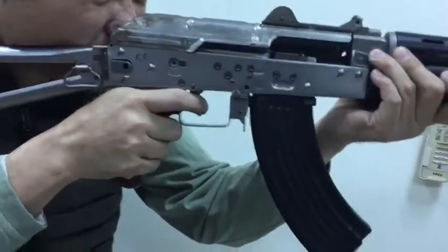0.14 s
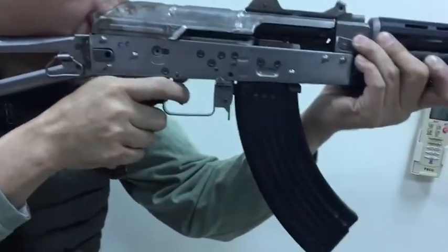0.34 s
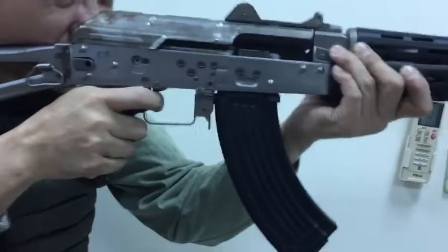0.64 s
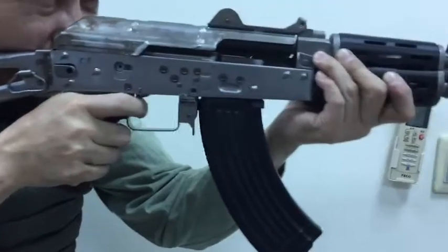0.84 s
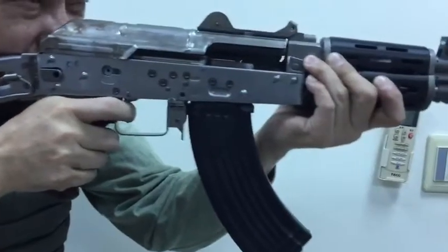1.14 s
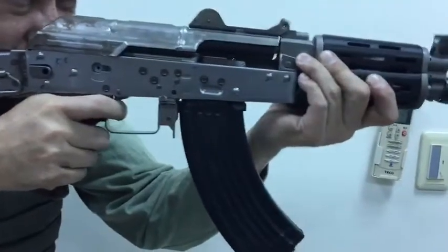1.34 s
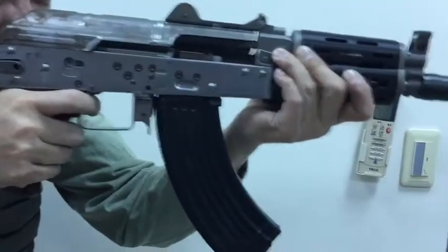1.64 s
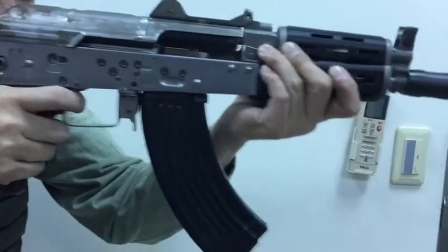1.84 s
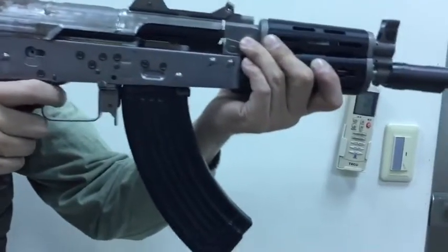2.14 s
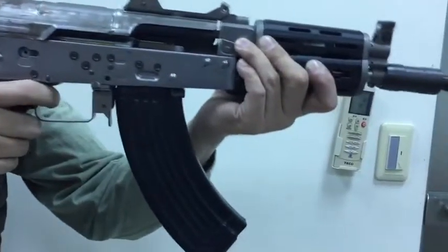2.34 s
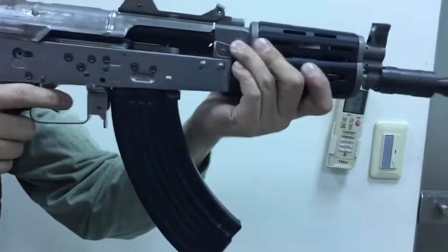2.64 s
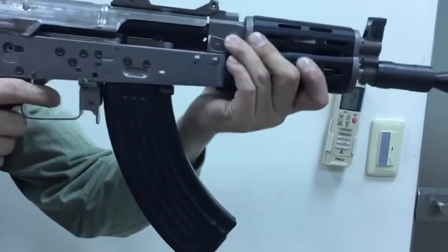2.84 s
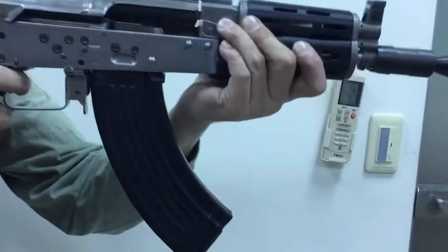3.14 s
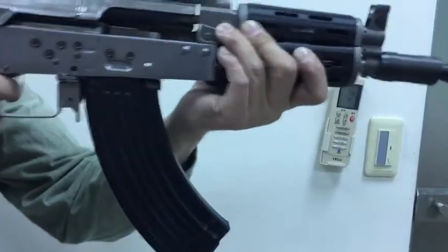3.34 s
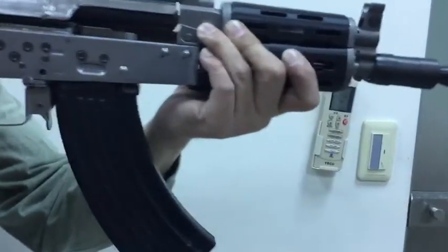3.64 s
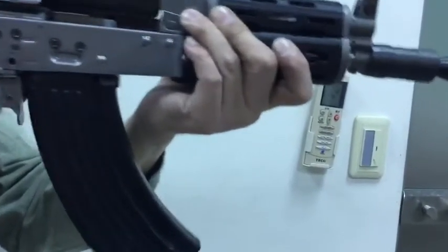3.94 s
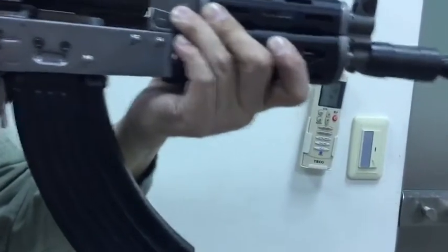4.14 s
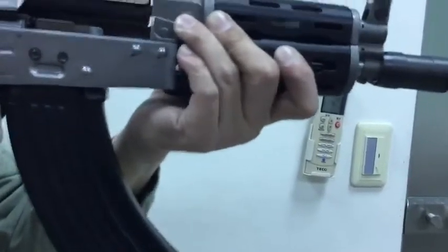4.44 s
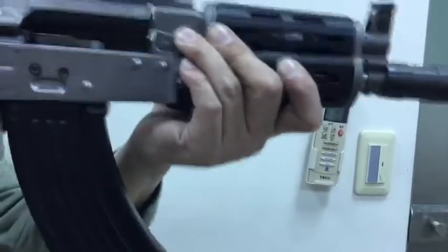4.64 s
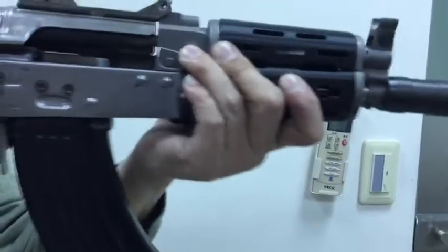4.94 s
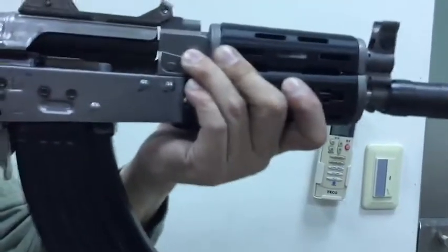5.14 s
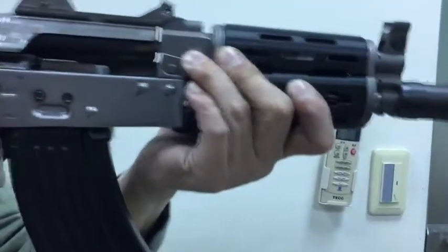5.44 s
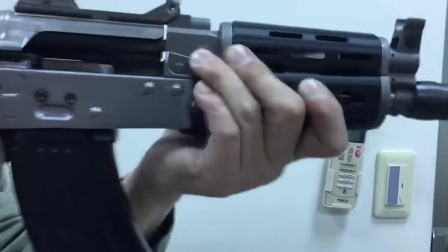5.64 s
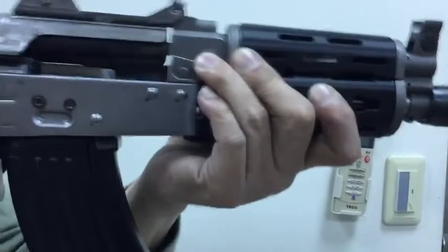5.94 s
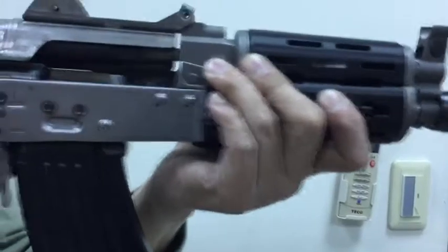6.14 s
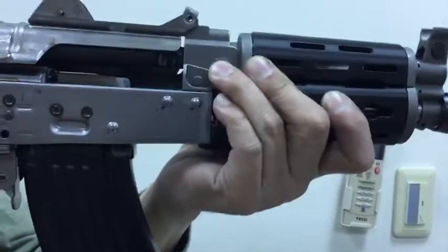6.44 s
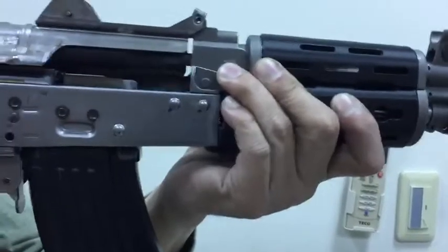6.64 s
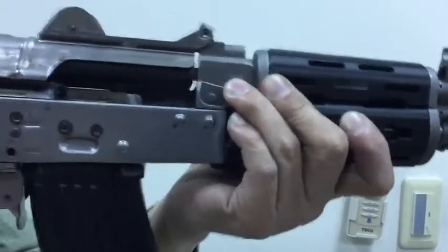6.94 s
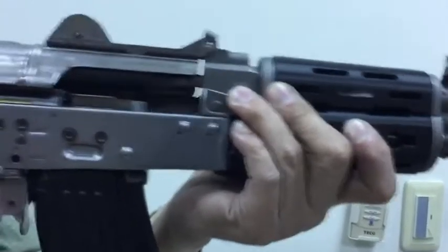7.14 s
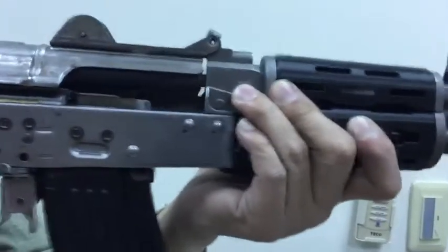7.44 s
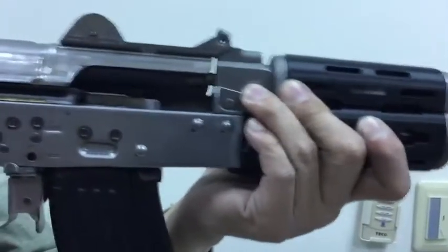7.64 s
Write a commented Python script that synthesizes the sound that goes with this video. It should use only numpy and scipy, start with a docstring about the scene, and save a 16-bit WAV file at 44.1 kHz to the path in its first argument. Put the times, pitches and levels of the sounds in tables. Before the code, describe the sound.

After a faint sleeve rustle, an electric airsoft rifle fires three full-auto bursts with brief pauses between them: a long one, a longer one, then a short one. Each shot is a piston thump followed by a sharp steel clack, repeating fast and evenly over a whining, grinding motor. The microphone is close, and the hard walls of a small room add a short echo.

```python
"""Airsoft rifle in a small room

An electric blowback airsoft rifle fires three full-auto bursts close to the microphone. Its motor
whines up and slows each time it pulls the spring. Fourteen times a second the piston thumps home and
the steel bolt cover clacks shut after it. Hard, near walls echo each blow, and the loudest blows clip."""
import sys
import numpy as np
from scipy import signal
from scipy.fft import rfft, irfft, next_fast_len
from scipy.io import wavfile
from scipy.ndimage import uniform_filter1d, map_coordinates

SR = 44100
rng = np.random.default_rng(int(sys.argv[2]) if len(sys.argv) > 2 else 0)


def output_pcm(signal):
    """Save a mono or channel-first signal as 16-bit PCM at the path in sys.argv[1].

    Samples are clipped to [-1, 1] before scaling.
    """
    pcm = np.clip(np.atleast_2d(signal).T, -1, 1) * 32767
    wavfile.write(sys.argv[1], SR, np.round(pcm).astype(np.int16))


N = 343539
TIME = np.arange(N) / SR
BLOW_TIME = np.arange(SR // 12) / SR  # the seconds within one blow

# Tone of the still air, a rustling sleeve and the room's echo: (frequency [Hz], level [dB])
AIR_TONE = [(25, -16), (60, -10), (130, -11.5), (220, -17.5), (500, -23), (1500, -22), (5000, -30),
            (15000, -47)]
CLOTH_TONE = [(290, -43.5), (500, -9.5), (1680, -2), (2290, 3), (2840, -4.5), (5780, -3.5), (15000, -18.5)]
ECHO_TONE = [(60, -2.5), (200, -13), (500, -9.5), (900, -8.5), (2000, -7.5), (3200, -14.5), (6000, -12),
             (15000, -7.5)]
# How loudly the sleeve rustles: (time [s], level [dB])
SLEEVE_LEVEL = [(0, -63.5), (.17, -61.5), (.23, -73), (.32, -75), (.38, -62), (.44, -76), (.54, -57),
                (.6, -100)]
# How long the echo takes to fade by 60 dB: (frequency [Hz], fade time [s])
ECHO_FADE = [(100, .45), (260, 0.63), (800, 0.43), (2000, 0.43), (5000, 0.62), (13000, 0.33)]
# Standing waves, the notes the room holds: (frequency [Hz], level [dB], fade time [s])
ROOM_NOTES = [(131.7, -60.5, 0.71), (153, -92, .37), (179.3, -67, 0.51), (255.5, -55, 0.38),
              (280, -61, .45), (383.6, -50, 0.1), (506, -82, 0.21), (886, -55, 0.17)]
# First and second bounces off the near walls: (delay [s], treble limit [Hz])
WALL_BOUNCES = [(.0046, 4400), (.0076, 4400), (.011, 900), (.0151, 700)]
# Strength of each of those bounces: (level [dB])
BOUNCE_DB = [-18.5, -13, -30.5, -19]

# Trigger pulls: (motor start [s], first strike [s], second strike [s], starting gap [s], shots [count])
TRIGGER_PULLS = [(.550, .6053, .6583, .06870, 31), (3.183, 3.2487, 3.3240, .06968, 45),
                 (6.708, 6.7647, 6.8434, .07074, 15)]
# The gap between shots grows as the battery sags, one value a pull: (time added per shot [s])
BATTERY_SAG = [.0000292, .0000228, .0000260]
# Each burst opens loud, then settles, one value a pull: (boost at motor start [dB])
OPENING_BOOST = [15, 12, 5]
# Recoil shakes the rifle in the hands: (time [s], level [dB])
RECOIL_BUMPS = [(4.12, -25), (4.25, -27), (4.466, -21), (4.604, -21), (5.095, -23), (5.585, -18),
                (6.15, -24), (6.865, -21), (7.64, -22)]

# Motor speed over one pull of the spring: (place in the cycle [0-1], share of free speed [0-1])
SPEED_UNDER_LOAD = [(0, .9), (.06, .94), (.36, 1), (.57, 1), (.71, .965), (.83, .925), (.94, .89), (1, .9)]
# The whine at even steps from one strike to the next: (level [dB])
WHINE_STRAIN = [-11, -13, -3.5, -1, 1, 5.5, 1.5, -4]
# Pitches the gearbox shell favours, and the tone of the grinding gears: (frequency [Hz], level [dB])
SHELL_TONE = [(400, -21.5), (800, 9), (1150, -9), (1570, 6), (2200, -10.5), (3050, 0), (4000, -1.5),
              (6000, -12.5), (9000, -23.5)]
GRIND_TONE = [(100, -37.5), (420, -22), (640, 1), (830, 10.5), (1150, 2), (1600, 1), (2400, 4), (3200, 6),
              (5000, 1.5), (6300, 4), (7800, -4.5), (9200, 0), (10400, -6.5), (13500, -5)]

# Notes of struck parts: (frequency [Hz], level [dB], fade time [s])
RACK_NOTES = [(4170, -4, 0.015), (5420, -10, 0.014), (6040, -4.5, 0.015), (11700, -6.5, .012),
              (12500, -8, 0.011), (13760, -9.5, .012), (15200, -11.5, 0.011)]  # the piston's row of teeth
SPRING_NOTES = [(11050, -79, .9)]  # the bolt's return spring
STEEL_NOTES = [(782, -18, 0.027), (1393, -12.5, 0.025), (1825, -17.5, 0.036), (2365, -13.5, 0.017),
               (3135, -5, 0.014), (3420, -14.5, 0.016), (3758, -13.5, 0.029), (4497, -14, 0.026),
               (5370, -11, 0.017), (6060, -3.5, 0.0071), (6955, -11.5, 0.017)]  # the steel body, hit by the bolt
THUMP_NOTES = [(139, -60.5, 0.029), (194.3, -22.5, 0.069), (294.9, -16, 0.11), (438, -9, 0.025),
               (536.6, -6.5, 0.022), (655, -27, 0.066), (843.6, -7, 0.022), (906, -14.5, 0.051),
               (947, -8, 0.022), (1093, -16.5, 0.04), (1364, -10, 0.019), (1587, -20, 0.081),
               (1966, -5, 0.02), (2447, -14.5, .025), (3140, -8.5, 0.021), (3544, -7, 0.011)]  # gearbox, barrel and body, hit by the piston
# Tone of the short noises in a shot: (frequency [Hz], level [dB])
SNAP_TONE = [(2000, -17), (5000, -20.5), (7000, -0.5), (9200, 0.5), (10400, -10), (11400, 0.5),
             (15500, -0.5)]
CLACK_TONE = [(60, -27), (130, -8.5), (450, -1.5), (900, 4.5), (2600, -2), (3300, 4.5), (6700, 0),
              (7800, -7.5), (9200, -0.5), (10400, -10.5), (11400, -0.5), (12900, -6.5), (13900, -5.5),
              (15500, -1.5)]
PUFF_TONE = [(25, -26.5), (60, -27), (150, -26.5), (450, -22), (800, 4.5), (1500, -6.5), (3300, -4.5),
             (5000, -5.5), (6500, -5.5), (8000, -17.5), (9200, -4.5), (10400, -12.5), (11600, -9),
             (15500, 0.5)]
# Small linked parts touch in every shot: (time from the piston strike [s], level [dB])
LINK_CLICKS = [(-.0089, -14), (.0175, -18.5), (0.0288, -4.5), (0.0329, -10.5), (0.0465, -16.5)]
# Loose parts knock as the action starts and stops: (time [s], level [dB])
LOOSE_KNOCKS = [(2.716, -13.5), (2.996, -49), (3.2395, -17), (3.302, -9), (3.314, 0), (6.383, -22),
                (6.7995, -4)]
# How strongly the piston's middle notes ring: (time [s], level [dB])
MIDDLE_LEVEL = [(.6, 0.5), (1.1, 0.5), (1.55, 4.5), (1.69, 1), (1.76, -4), (1.9, -5.5), (1.97, 2), (2.5, 1),
                (3.45, 0), (4.25, 0.5), (4.6, 1.5), (5.8, 1.5), (6.3, 0.5), (7.79, 1)]

SETTLE_S = 0.17  # how quickly the opening boost dies away
BOLT_BOOST_SHARE, GEAR_BOOST_SHARE = 0.46, 0.75  # how much of that boost these parts get
JITTER_S = .0002  # random timing of the rack and bolt


def gain(db):
    """Turn decibels into a number to multiply by."""
    return 10 ** (np.asarray(db) / 20)


def normalise(x):
    """Scale a signal to an average strength (rms) of 1."""
    return x / np.sqrt(np.mean(x ** 2) + 1e-20)


def at_pitch(table, hz):
    """Read a table between its frequencies, on a log scale."""
    frequencies, values = np.transpose(table)
    return np.interp(np.log(hz + 1), np.log(frequencies), values)


def fade(t, fade_s):
    """Die away by 60 dB every fade_s seconds."""
    return np.exp(-np.log(1000) * t / fade_s)


def rise(t, rise_s):
    """Climb from 0 towards 1, most of the way in rise_s seconds."""
    return 1 - np.exp(-t / rise_s)


def wobble(rate):
    """A smooth curve through rate random points a second."""
    return map_coordinates(rng.standard_normal(int(TIME[-1] * rate) + 4), [TIME * rate])


def noise(tone, size):
    """Noise of strength 1, shaped by a tone table."""
    padded = next_fast_len(size)
    shape = gain(at_pitch(tone, np.fft.rfftfreq(padded, 1 / SR)))
    return normalise(irfft(rfft(rng.standard_normal(padded)) * shape, padded)[:size])


def short_noise(tone, rise_s, fade_s):
    """A noise that swells and dies within one blow."""
    return noise(tone, len(BLOW_TIME)) * rise(BLOW_TIME, rise_s) * fade(BLOW_TIME, fade_s)


def ring(notes, t, scatter_db=0, phase=0, detune=0):
    """The fading notes of a struck thing; scatter_db and detune vary their level and pitch."""
    hz, db, fade_s = np.transpose(notes)[:, :, None]
    hz = hz * (1 + detune * rng.standard_normal(hz.shape))
    db = db + scatter_db * rng.standard_normal(hz.shape)
    return np.sum(gain(db) * fade(t, fade_s) * np.sin(2 * np.pi * hz * t + phase), axis=0)


def add(track, when, sound):
    """Mix a sound into the track at a time in seconds."""
    part = track[max(round(when * SR), 0):][:len(sound)]
    part += sound[:len(part)]


def pulls():
    """Each trigger pull as (motor start, strike times, opening boost); the firing slowly slackens."""
    for (start, first, second, gap, count), sag, boost_db in zip(TRIGGER_PULLS, BATTERY_SAG, OPENING_BOOST):
        k = np.arange(count - 1)
        yield start, np.append(first, second + k * gap + sag * k ** 2 / 2), boost_db


def shots():
    """Each piston strike as (time, what is left of the opening boost in dB)."""
    for start, strikes, boost_db in pulls():
        for when in strikes:
            yield when, boost_db * np.exp(-(when - start) / SETTLE_S)


def background():
    """Still air, a 120 Hz mains hum and a sleeve shifting before the first burst."""
    air = gain(-67) * noise(AIR_TONE, N)
    hum = gain(-69.5) * np.sin(2 * np.pi * 120 * TIME)
    sleeve = gain(np.interp(TIME, *np.transpose(SLEEVE_LEVEL))) * noise(CLOTH_TONE, N)
    return air + hum + sleeve


def echo_tail(t):
    """Countless bounces blur into noise, each frequency fading at its own speed."""
    hz, times, spectrum = signal.stft(rng.standard_normal(len(t)), SR, nperseg=256)
    spectrum *= fade(times, at_pitch(ECHO_FADE, hz)[:, None])
    spectrum *= gain(at_pitch(ECHO_TONE, hz))[:, None]
    tail = signal.istft(spectrum, SR, nperseg=256)[1][:len(t)] * rise(t, 0.0011)
    return tail / np.linalg.norm(tail)


def room(rifle):
    """The room adds dull wall bounces, its own notes and an echo that changes as the rifle moves."""
    t = TIME[:SR * 3 // 5]
    response = ring(ROOM_NOTES, t)
    response[0] += 1  # the direct sound
    for (delay, treble_hz), db in zip(WALL_BOUNCES, BOUNCE_DB):
        smear = signal.get_window("hann", round(SR / treble_hz))
        add(response, delay, gain(db) * smear / smear.sum())
    out = signal.fftconvolve(rifle, response)[:N]
    hop = SR // 4
    for start in range(0, N, hop):  # each overlapping piece gets a fresh tail
        piece = rifle[start:start + 2 * hop]
        piece = piece * np.hanning(2 * hop)[:len(piece)]
        add(out, start / SR, gain(-9) * signal.fftconvolve(piece, echo_tail(t)))
    return out


def recoil():
    """The shoulder pads the stock, so each bump is a soft, low swing at 59 Hz."""
    out = np.zeros(N)
    for when, db in RECOIL_BUMPS:
        add(out, when, ring([(59, db + 7.5, 0.05)], BLOW_TIME) * rise(BLOW_TIME, 0.0079))
    return out


def motor_motion(spin_up_s=.051, run_on_s=.026, gear_db=-25.5):
    """The motor spins up, runs and coasts: its loudness, speed and place in the firing cycle."""
    loudness, speed, place = np.zeros((3, N))
    for start, strikes, boost_db in pulls():
        since = np.maximum(TIME - start, 0)
        coast = fade(np.clip(TIME - strikes[-1] - run_on_s, 0, 1), fade_s=.15)
        db = gear_db + GEAR_BOOST_SHARE * boost_db * np.exp(-since / SETTLE_S)
        loudness += gain(db) * rise(since, 0.018) * coast
        speed = np.where(TIME > start, rise(since, spin_up_s) * coast ** .1, speed)
        gap = strikes[-1] - strikes[-2]
        edges = np.r_[strikes[0] - gap, strikes, strikes[-1] + gap]
        place = np.where(TIME > start, np.interp(TIME, edges, np.arange(len(edges))) % 1, place)
    return loudness, speed, place


def motor(free_tooth_hz=3170, chatter_db=4.5):
    """Meeting gear teeth whine, lower and harder as the spring is pulled; the gears grind underneath."""
    loudness, speed, place = motor_motion()
    flutter = normalise(uniform_filter1d(rng.standard_normal(N), 150))
    flutter *= 0.01575 + .05 * (1 - speed)  # a slow motor is less steady
    load = np.interp(place, *np.transpose(SPEED_UNDER_LOAD))
    drift = 1 + .005 * wobble(25)
    tooth_hz = free_tooth_hz * speed * load * drift
    phase = 2 * np.pi * np.cumsum(tooth_hz * (1 + flutter)) / SR
    strain_db = np.interp(place, np.linspace(0, 1, len(WHINE_STRAIN)), WHINE_STRAIN) + 0.92 * wobble(40)
    whine = sum(gain(at_pitch(SHELL_TONE, k * tooth_hz)) * np.sin(k * phase) for k in (1, 2, 3))
    whine *= gain(chatter_db * (wobble(350) - .5))  # the teeth touch unevenly
    rub = 1 + .5 * np.sin(phase / 10)  # the motor's gear rubs hardest once a turn
    grind = gain(2) * rub * noise(GRIND_TONE, N)
    return loudness * (gain(strain_db) * whine + grind)


def rack(lead_s=.0089):
    """The piston's last tooth slips off the gear with a bright ping, just before the strike."""
    out = np.zeros(N)
    for when, boost_db in shots():
        phase = rng.uniform(0, 2 * np.pi, (len(RACK_NOTES), 1))
        ping = ring(RACK_NOTES, BLOW_TIME, scatter_db=4.5, phase=phase, detune=0.012)
        add(out, when - lead_s + rng.normal(0, JITTER_S), gain(-16 + BOLT_BOOST_SHARE * boost_db) * ping)
    return out


def clack(ring_db):
    """Steel hits steel: a hard snap, a bright rattle, then the rifle's body rings."""
    phase = rng.uniform(0, 2 * np.pi, (len(STEEL_NOTES), 1))
    body = ring(STEEL_NOTES, BLOW_TIME, scatter_db=2, phase=phase, detune=0.016)
    snap = gain(-0.5) * short_noise(SNAP_TONE, rise_s=.0001, fade_s=0.0086)
    rattle = gain(-2.5) * short_noise(CLACK_TONE, rise_s=0.0014, fade_s=0.025)
    return snap + rattle + gain(ring_db) * body * rise(BLOW_TIME, 0.0014)


def bolt(delay_s=.0218, slam_db=0.25, link_db=1.45):
    """The bolt cover slams shut after each shot; small parts click and knock, and its spring sings on."""
    out = np.zeros(N)
    for when, boost_db in shots():
        force_db = BOLT_BOOST_SHARE * boost_db + rng.normal(0, 0.41)
        add(out, when + delay_s + rng.normal(0, JITTER_S), gain(slam_db + force_db) * clack(ring_db=2))
        for offset, click_db in LINK_CLICKS:
            click_time = when + offset + rng.normal(0, .0004)
            strength = gain(link_db + force_db + click_db + rng.normal(0, 1))
            add(out, click_time, strength * short_noise(CLACK_TONE, rise_s=0.00033, fade_s=0.011))
    for when, db in LOOSE_KNOCKS:
        add(out, when, gain(db) * clack(ring_db=7))
    spring = signal.fftconvolve(out, ring(SPRING_NOTES, TIME[:SR // 2]))[:N]
    return out + spring


def piston(middle_hz=(700, 1200)):
    """The padded piston thumps home with a tick and a puff of air; its middle notes vary by shot."""
    out = np.zeros(N)
    notes = np.array(THUMP_NOTES)
    is_middle = (middle_hz[0] < notes[:, 0]) & (notes[:, 0] < middle_hz[1])
    steady = ring(notes[~is_middle], BLOW_TIME)
    cushion = rise(BLOW_TIME, .0008)
    for when, boost_db in shots():
        middle_db = np.interp(when, *np.transpose(MIDDLE_LEVEL)) + rng.normal(0, 1.2)
        middle = gain(middle_db) * ring(notes[is_middle], BLOW_TIME, detune=.005)
        thump = gain(-1.58) * cushion * (steady + middle)
        puff = gain(-8.5 + .3 * middle_db) * short_noise(PUFF_TONE, rise_s=0.00073, fade_s=0.04)
        tick = gain(-3.5) * short_noise(CLACK_TONE, rise_s=.0003, fade_s=0.013)
        add(out, when, gain(boost_db) * (thump + puff + tick))
    return out


def scene():
    """The rifle in its room, as one channel."""
    rifle = rack() + piston() + bolt() + motor() + recoil()
    return (room(rifle) + background())[None]


def record(dry):
    """The microphone loses deep bass, rounds off the loudest peaks and cuts the highest treble."""
    bottom_hz, top_hz, ceiling = 52, 15650, .97
    thin = signal.sosfilt(signal.butter(3, bottom_hz, "highpass", fs=SR, output="sos"), dry)
    clipped = thin / (1 + np.abs(thin / ceiling) ** 8) ** (1 / 8)
    padded = next_fast_len(N + SR // 4)
    treble_cut = 1 / (1 + (np.fft.rfftfreq(padded, 1 / SR) / top_hz) ** 160)
    return irfft(rfft(clipped, padded) * treble_cut, padded)[..., :N]


dry = scene()
out = record(dry)
output_pcm(out)
```